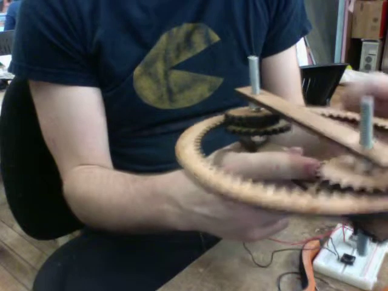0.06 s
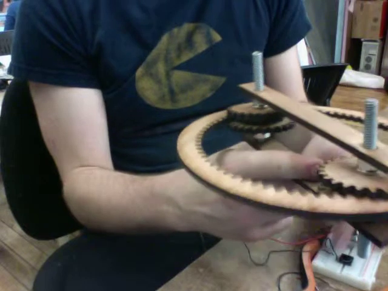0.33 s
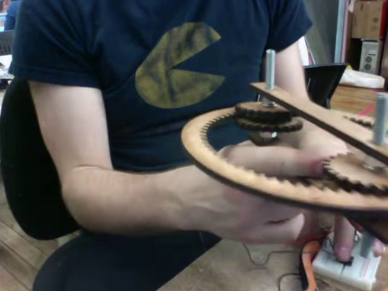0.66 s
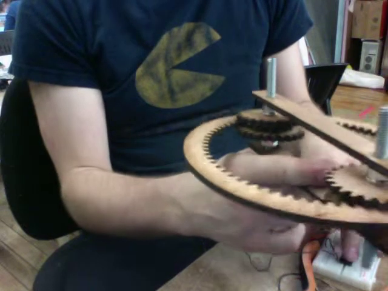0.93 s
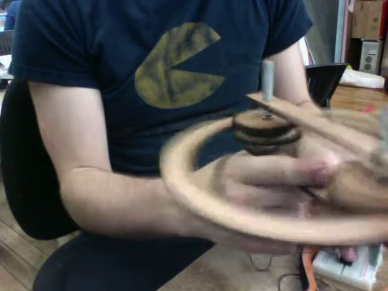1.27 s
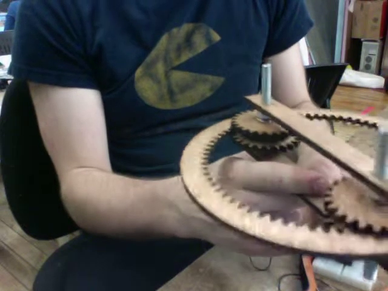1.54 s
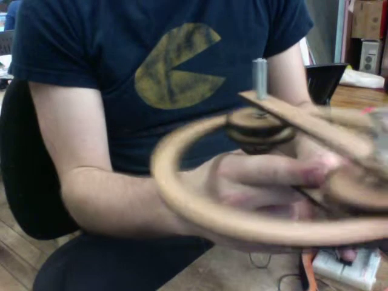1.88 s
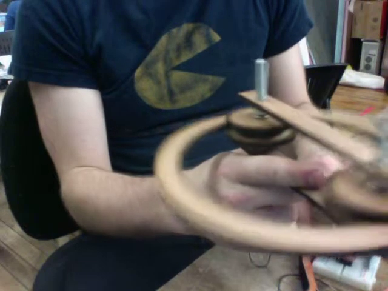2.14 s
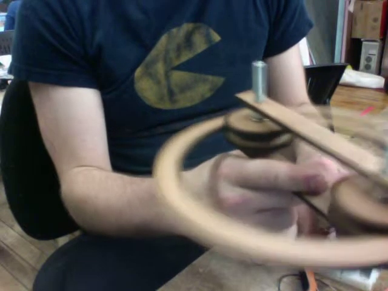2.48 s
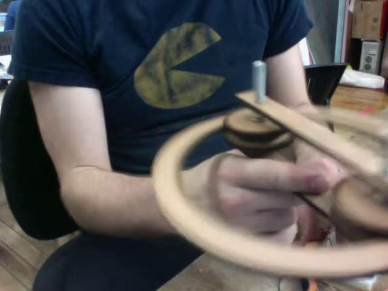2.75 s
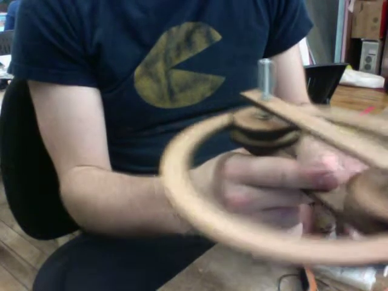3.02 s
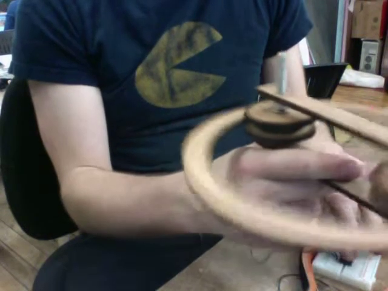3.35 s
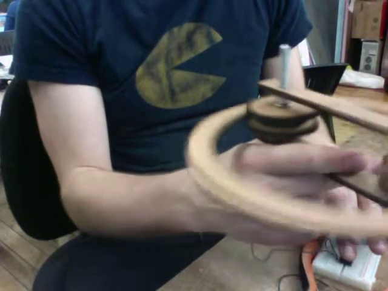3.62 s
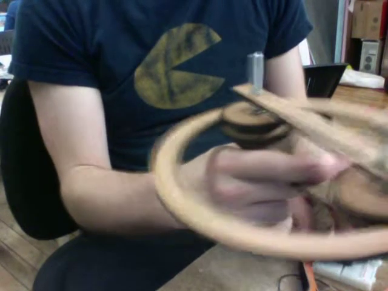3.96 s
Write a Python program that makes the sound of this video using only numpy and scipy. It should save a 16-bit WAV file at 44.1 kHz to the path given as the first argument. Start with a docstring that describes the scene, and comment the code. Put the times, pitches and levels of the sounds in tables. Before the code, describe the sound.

Thin wooden gears rattle and clack close by, nudged briefly, then spun steadily.

```python
"""A thin wooden ring gear is nudged, rests, then is spun by hand around its small wooden gears.
Each tooth that catches is a flurry of tiny impacts that ring the plywood; loose teeth rattle in between.
Teeth stick and slip in tiny squeaks, single teeth tick at rest, and the frame knocks and rumbles
in the hand. All is close by, in a quiet room that hums faintly."""
import sys
import numpy as np
from scipy import signal
from scipy.fft import rfft, irfft
from scipy.io import wavfile
from scipy.ndimage import uniform_filter1d

SR = 44100
rng = np.random.default_rng(int(sys.argv[2]) if len(sys.argv) > 2 else 0)


def persist_wave(psi):
    """Save psi, clipped to +-1, as 16-bit WAV."""
    counts = np.round(np.clip(psi, -1, 1) * 32767).astype(np.int16)
    wavfile.write(sys.argv[1], SR, np.atleast_2d(counts).T)


N = 176400

# plywood gear modes (frequency [Hz], width [Hz], gain [dB])
GEAR_MODES = [(1368, 90, -12.5), (1967, 315, -4), (2455, 203, 0), (2912, 266, 2), (4205, 240, -4),
              (4896, 450, -6), (5890, 340.3, -4.5), (6590, 430, -6), (7446, 360, -6.5), (8780, 690, -11.5),
              (10400, 496.6, -18.5), (12080, 604.5, -18), (13800, 573, -26), (14900, 700, -27)]
# whole-frame modes (frequency [Hz], width [Hz], gain [dB])
FRAME_MODES = [(115, 82, -10.5), (206, 89, -3), (280, 126, -2), (382, 110, 4), (487, 126, -3),
               (637, 118, 2), (756, 107, 2.5), (846, 150, -2), (1171, 105, -1)]
GEAR_HZ, FRAME_HZ = np.transpose(GEAR_MODES)[0], np.transpose(FRAME_MODES)[0]
TIME_S = np.arange(N) / SR


def amp(db):
    """Decibels to gain."""
    return 10 ** (np.asarray(db) / 20)


def unit(x):
    """Scale to rms 1."""
    return x / np.sqrt(np.mean(x ** 2) + 1e-20)


def at_hz(curve, hz):
    """Interpolate a table on a log-frequency axis."""
    knots_hz, value = np.transpose(curve)
    return np.interp(np.log(hz + 1), np.log(knots_hz + 1), value)


def add(mix, start_s, sound):
    """Mix a sound in at start_s."""
    part = mix[max(round(start_s * SR), 0):][:len(sound)]
    part += sound[:len(part)]


def noise(spectrum):
    """Steady shaped noise, rms 1."""
    gain = amp(at_hz(spectrum, np.fft.rfftfreq(N, 1 / SR)))
    return unit(irfft(rfft(rng.standard_normal(N)) * gain, N))


def coloured(x, curve):
    """Minimum-phase filter with a given gain curve."""
    log_gain = np.log(amp(at_hz(curve, abs(np.fft.fftfreq(4096, 1 / SR)))))
    response = np.exp(np.conj(signal.hilbert(log_gain)))
    return signal.oaconvolve(x, np.fft.ifft(response).real[:2048])[:N]


def impacts(size, per_s, spread_db):
    """Tiny impacts at random times, most weak, a few strong."""
    strength = amp(spread_db * np.minimum(rng.exponential(1, size), 3))
    return (rng.random(size) < per_s / SR) * strength * rng.choice([-1, 1], size)


def ring(force, modes, gains_db=0, detune=0, place_spread=0.88):
    """Impacts ring damped modes; each lands elsewhere and so shares its energy differently."""
    hz, width_hz, db = np.transpose(modes)[:, :, None]
    hz = hz * (1 + detune * rng.standard_normal(hz.shape))
    t = np.arange(int(2 * SR / width_hz.min())) / SR
    gain = np.sqrt(width_hz) * amp(db + np.reshape(gains_db, (-1, 1)))
    responses = gain * np.exp(-np.pi * width_hz * t) * np.sin(2 * np.pi * hz * t)
    polarity = rng.choice([-1, 1], hz.shape)
    coupling = polarity + place_spread * rng.standard_normal((len(hz), force.shape[-1]))
    return signal.oaconvolve(force * coupling, responses, axes=1).sum(0)


def background(air_db=-53, wash_db=-48, wash_fall_db_per_s=24):
    """Room air, a faint hum and a soft wash that dies away."""
    # steady room tones (frequency [Hz], level [dB])
    hum_tones = [(284.5, -56.5), (486, -69.5), (684, -68.5)]
    # room air (frequency [Hz], relative density [dB])
    air_spectrum = [(25, -49.5), (60, -16), (110, -11.5), (200, -1), (290, 0), (350, -12.5), (480, -3.5),
                    (680, -14.5), (860, -14), (1100, -21), (1700, -25.5), (4500, -33.5), (8200, -36),
                    (11000, -46.5), (16000, -68)]
    # wash (frequency [Hz], relative density [dB])
    wash_spectrum = [(60, -22), (170, 5.5), (300, -11), (460, 3.5), (580, -9), (720, -1), (1050, -13),
                     (1550, -10), (2200, -20.5), (4200, -18.5), (8000, -31), (12000, -40), (16000, -58)]
    hum = sum(amp(db) * np.sqrt(2) * np.sin(2 * np.pi * hz * TIME_S) for hz, db in hum_tones)
    air = amp(air_db) * noise(air_spectrum)
    wash = amp(wash_db - wash_fall_db_per_s * TIME_S) * noise(wash_spectrum)
    return air + hum + wash


def room_tail(teeth, frame, teeth_db=-14.5, frame_db=-13):
    """Small room: sparse reflections, each band dying at its own rate."""
    # room decay (frequency [Hz], T60 [s])
    decay = [(150, 0.41), (1000, 0.95), (4000, 0.49), (8000, 0.23), (15000, 0.6)]
    # room's return of the teeth (frequency [Hz], gain [dB])
    return_colour = [(200, -5), (1400, -6), (2300, -3), (2900, -5.5), (3500, 0.5), (4200, -2.5),
                     (9000, -5.5), (15000, -16)]
    send = amp(teeth_db) * coloured(teeth, return_colour) + amp(frame_db) * frame
    size = SR // 2
    reflections = rng.standard_normal(size) * (rng.random(size) < .1) * (np.arange(size) > 200)
    hz, t, bands = signal.stft(reflections, SR, nperseg=256)
    tail = signal.istft(bands * amp(-60 * t / at_hz(decay, hz)[:, None]), SR, nperseg=256)[1]
    return signal.oaconvolve(send, tail / np.linalg.norm(tail))[:N]


def frame_rumble():
    """The turning ring shakes the frame with dense small impacts."""
    # rumble envelope (time [s], level [dB])
    envelope = [(.85, -69), (.92, -47.5), (1.1, -40), (1.25, -46), (1.4, -56), (1.5, -49.5), (1.68, -37),
                (2.05, -38), (2.3, -39), (2.6, -38), (4, -38.5)]
    force = impacts(N, per_s=1200, spread_db=3.5)
    return amp(np.interp(TIME_S, *np.transpose(envelope))) * unit(ring(force, FRAME_MODES)[:N])


def frame_knocks(decay_s=.005, gain_db=2):
    """Dull blows ring the frame in the hand."""
    # blows (time [s], level [dB])
    blows = [(1.09, -35), (1.139, -43), (1.538, -30), (1.687, -30.5), (1.745, -32), (1.772, -31.5),
             (1.952, -31.5), (1.985, -30.5), (2.013, -35), (2.029, -31.5), (2.056, -30), (2.105, -33),
             (2.138, -32), (2.413, -34), (2.594, -30.5), (2.624, -28.5), (2.667, -33.5), (2.739, -30),
             (2.774, -28.5), (2.893, -34), (2.924, -37), (2.967, -28.5), (3.034, -36), (3.091, -32),
             (3.106, -30), (3.188, -34), (3.432, -32), (3.47, -29), (3.505, -26.5), (3.544, -28.5),
             (3.858, -34.5)]
    # drive of the frame modes (frequency [Hz], gain [dB])
    excitation = [(120, -13), (300, -9), (750, 7.5), (1200, -2)]
    press = np.exp(-np.arange(0, 5 * decay_s, 1 / SR) / decay_s)
    mix = np.zeros(N)
    for time_s, db in blows:
        sound = ring(press * rng.standard_normal(len(press)), FRAME_MODES, at_hz(excitation, FRAME_HZ))
        sound *= np.sqrt(decay_s * SR) / np.linalg.norm(sound)
        add(mix, time_s - decay_s / 2, amp(db + gain_db) * sound)
    return mix


def contact_db(ring_db, treble_db, ring_hz=2800, sigma_hz=380, treble_hz=7000):
    """Gain per gear mode: a contact weights the tooth's ring and the treble."""
    near_ring = np.exp(-((GEAR_HZ - ring_hz) / sigma_hz) ** 2 / 2)
    return ring_db * near_ring + treble_db * (GEAR_HZ > treble_hz)


def tooth_ticks(gain_db=-0.5):
    """Single teeth drop into place at rest: light, bright taps."""
    # taps (start [s], length [s], level [dB], tooth ring [dB], treble [dB])
    taps = [(0.576, 0.0029, -25, 6, -1.5), (1.2729, .001, -14, 1, -4)]
    # drive of the gear modes (frequency [Hz], gain [dB])
    excitation = [(1400, -31), (2400, -15), (3000, -7.5), (4200, 0), (5900, 5.5), (8000, 10), (12000, -4),
                  (15000, -2)]
    mix = np.zeros(N)
    for start_s, length_s, db, ring_db, treble_db in taps:
        size = int(length_s * SR)
        gains_db = contact_db(ring_db, treble_db) + at_hz(excitation, GEAR_HZ)
        sound = ring(rng.standard_normal(size), GEAR_MODES, gains_db)
        add(mix, start_s, amp(db + gain_db) * sound * np.sqrt(size) / np.linalg.norm(sound))
    return mix


def tooth_squeaks(jitter_rad=0.22, pitch_sag=0.083, grit_db=-12, gain_db=-0.5):
    """Stick and slip drive one mode for milliseconds: a falling tone with grit."""
    # squeaks (centre [s], length [s], pitch [Hz], level [dB])
    squeaks = [(0.574, .006, 2830, -36), (0.5804, .006, 2800, -37), (1.118, .008, 2900, -17),
               (1.1446, .007, 2915, -19), (1.558, .006, 10500, -31), (1.587, .005, 10530, -24),
               (1.716, .007, 2940, -21), (1.7476, .006, 4230, -19), (1.7793, .007, 4210, -14),
               (1.803, .007, 3000, -28), (1.8766, .008, 2896, -17), (1.969, .007, 3040, -18),
               (2.0462, .008, 2930, -17.5), (2.279, .005, 7490, -22), (2.2844, .012, 2920, -23),
               (2.4658, .009, 2920, -19), (2.5961, .006, 2990, -15.5), (2.6141, .007, 2940, -20),
               (2.7626, .007, 2900, -13), (2.7877, .006, 10300, -27), (2.925, .007, 2940, -17.5),
               (3.134, .007, 2943, -23), (3.2145, .007, 3010, -19), (3.369, .006, 4290, -22),
               (3.533, .007, 4185, -14), (3.576, .006, 3030, -17), (3.6419, .005, 2900, -16),
               (3.6623, .007, 2920, -15), (3.672, .006, 10250, -25), (3.7995, .012, 2960, -20),
               (3.9003, .007, 2990, -19.5), (3.9234, .007, 2960, -21.5), (3.957, .007, 2886, -10.5)]
    mix = np.zeros(N)
    for centre_s, length_s, hz, db in squeaks:
        size = int(length_s * SR)
        progress = np.linspace(0, 1, size)
        jitter = jitter_rad * unit(uniform_filter1d(rng.standard_normal(size), size=30))
        glide_hz = hz * (1 + pitch_sag * (.5 - progress))
        tone = np.sqrt(2) * np.sin(2 * np.pi * np.cumsum(glide_hz) / SR + jitter)
        grit = unit(ring(rng.standard_normal(size) * (1 - progress) ** 2, GEAR_MODES)[:size])
        envelope = amp(db + gain_db) * np.sin(np.pi * progress ** 0.89)
        add(mix, centre_s - length_s / 2, envelope * (tone + amp(grit_db) * grit))
    return mix


def free_play():
    """Gain that dips briefly where the teeth lose touch."""
    # lulls (centre [s], 1/e half width [s], gain [dB])
    lulls = [(1.064, .005, -4), (1.215, 0.00443, -1), (1.602, 0.007, -7), (1.756, 0.00509, -0.5),
             (1.793, .006, -5), (1.897, .008, -5), (2.095, .004, -4.5), (2.115, 0.0067, -4),
             (2.203, 0.0061, -7.5), (2.293, 0.00449, -13), (2.365, 0.0056, -14), (2.388, 0.0062, -7),
             (2.606, 0.00684, -9), (2.683, .005, -6.5), (2.753, 0.0034, -3.5), (2.821, .004, -1.5),
             (2.836, 0.0049, -1.5), (2.902, 0.00503, -6), (3.05, 0.011, -1), (3.125, 0.0041, -15),
             (3.49, 0.00592, -5.5), (3.528, 0.0037, -1.5), (3.566, 0.00428, -1.5), (3.647, 0.00894, -15),
             (3.893, 0.0062, -8)]
    return amp(sum(db * np.exp(-((TIME_S - centre_s) / half_s) ** 2) for centre_s, half_s, db in lulls))


def tooth_rattle(drift_db=4, drift_per_s=140, gain_db=3):
    """Loose teeth rattle; the contact point wanders, so one mode after another stands out."""
    # rattle envelope (time [s], level [dB])
    envelope = [(.87, -71.5), (.895, -35.5), (.97, -45), (1.03, -33.5), (1.09, -29), (1.19, -33.5),
                (1.25, -44), (1.28, -73), (1.48, -63), (1.51, -46), (1.61, -28.5), (1.68, -25.5),
                (2.05, -26), (2.3, -26), (2.5, -26), (3.4, -26), (3.65, -26), (4, -28)]
    knots_s = np.arange(0, N / SR, 1 / drift_per_s)
    knot_gains = amp(drift_db * rng.standard_normal((len(knots_s), len(GEAR_MODES))))
    drift = np.array([np.interp(TIME_S, knots_s, gains) for gains in knot_gains.T])
    force = drift * impacts(N, per_s=1800, spread_db=3.5)
    shake = amp(gain_db + np.interp(TIME_S, *np.transpose(envelope)))
    return shake * unit(ring(force, GEAR_MODES)[:N])


def tooth_clacks(scrape_gain=0.53, first_blow=1.5, release_s=.002, mode_spread_db=2.5, gain_db=-1):
    """Each catching tooth scrapes in, strikes, chatters against its neighbour and lets go."""
    # catches (start [s], length [s], rise [s], level [dB], tooth ring [dB], treble [dB])
    catches = [(0.8985, 0.0096, 0.0011, -22, 5, 3), (0.911, 0.0067, 0.0038, -22, 5, 3.5),
               (0.9402, 0.0028, 0.0011, -47.5, -1.0, -3.5), (0.9488, 0.0053, 0.0011, -23.5, -4.0, -3.5),
               (0.9961, 0.021, 0.0034, -36, 9.5, 5), (1.0297, 0.012, 0.004, -48, -4, -6),
               (1.0503, 0.01219, 0.0035, -22.5, -8, 1.0), (1.0733, 0.0054, 0.0013, -18.5, -15, -4),
               (1.0888, 0.018, 0.003, -18.5, 0.0, 4), (1.122, 0.006, 0.004, -22, -9, -6),
               (1.133, 0.018727, 0.0035, -20, -4, -1.0), (1.1609, 0.00799, 0.0034, -23.5, -6.5, 0),
               (1.1772, 0.007434, 0.0011, -21.0, -15, 4), (1.1832, 0.016, 0.004, -21.5, -1, 2.5),
               (1.2123, 0.005487, 0.0013, -22, -3, -1), (1.231, 0.00654, 0.004, -28.5, 2, -3.0),
               (1.5048, 0.01, 0.0009, -33.5, -1.0, 5), (1.5363, 0.004, 0.001, -17.5, -8, -6.5),
               (1.5474, 0.017, 0.004, -27, 0.5, -1), (1.5681, 0.00569, 0.0013, -41, -2.0, -7.5),
               (1.5858, 0.0063, 0.001, -16, -8.5, 0.5), (1.597, 0.003, 0.0038, -15, 6, 8.5),
               (1.6518, 0.012822, 0.004, -17, 3.5, 3), (1.691, 0.009023, 0.0034, -13.5, -15, 0),
               (1.705, 0.015, 0.004, -21, 5.5, 4.0), (1.715, 0.023, 0.004, -23.5, 8, -3.0),
               (1.7448, 0.00522, 0.0033, -18.5, -5.0, -4.0), (1.7754, 0.00635, 0.0011, -13.5, -4, -6.0),
               (1.8155, 0.04, 0.0037, -23.5, -4, 0.0), (1.8612, 0.032, 0.0033, -19.5, 1, 1),
               (1.907, 0.0078, 0.0011, -16, 0, 6), (1.951, 0.007361, 0.004, -15.5, 1.0, 3),
               (1.9787, 0.02, 0.004, -15.5, -4, 3.5), (1.9996, 0.015, 0.004, -20.5, 4, 4.5),
               (2.019, 0.021444, 0.004, -18.5, 0, 9.5), (2.0384, 0.012, 0.004, -21.5, 0, 4),
               (2.0504, 0.047, 0.004, -17, -1, -1.0), (2.1034, 0.0069, 0.0012, -12.5, -4.5, 4),
               (2.1357, 0.0097, 0.0031, -14, -3, 3.5), (2.158, 0.012, 0.004, -19.5, 1.0, 0),
               (2.1819, 0.007338, 0.004, -13, 0, 5), (2.2117, 0.017, 0.004, -19.5, 7, 8),
               (2.2414, 0.009, 0.004, -20.5, -7, -2), (2.2564, 0.011, 0.004, -15, 5, 9),
               (2.341, 0.02, 0.004, -19.5, -2.5, 8), (2.371, 0.0089, 0.0035, -25, 4.0, -4.5),
               (2.396, 0.028, 0.0031, -19.5, -4, 2.5), (2.431, 0.026, 0.0034, -18, 1.0, 2),
               (2.4753, 0.02, 0.0012, -19.0, -4, 1), (2.51, 0.007407, 0.004, -15, -4.5, 0),
               (2.527, 0.010143, 0.0027, -21.0, -5, 8), (2.5493, 0.0078, 0.0012, -13, -0.5, 4.5),
               (2.5663, 0.017, 0.004, -17.5, -7, -3), (2.592, 0.006785, 0.0012, -13, 2, 5),
               (2.614, 0.01963, 0.003, -19.0, -1, 2), (2.6474, 0.028, 0.004, -19, -0.5, 4),
               (2.685, 0.01, 0.0011, -17.5, 8, 1), (2.697, 0.013, 0.004, -18, -1, 7),
               (2.7206, 0.018, 0.0032, -21, -6, -6), (2.7436, 0.0046, 0.004, -13, -9.5, 10),
               (2.7715, 0.011, 0.0033, -16, -4, 1.0), (2.7828, 0.019, 0.004, -19.0, -6, 3),
               (2.815, 0.007, 0.0013, -10.5, -6, 5.5), (2.837, 0.022, 0.0028, -19.0, 2.0, -4),
               (2.8642, 0.014, 0.0034, -16.5, -7, -2), (2.88, 0.019, 0.004, -17, 2.5, 6),
               (2.9211, 0.012, 0.004, -14.5, -7, 3), (2.939, 0.04, 0.004, -19.5, -2.5, 6),
               (2.9965, 0.012, 0.0028, -15.5, -2, 1.5), (3.0176, 0.027, 0.004, -19, -1.5, 3),
               (3.0653, 0.006, 0.001, -15.5, -3, 0), (3.069, 0.0094, 0.004, -12.5, 4, 5.5),
               (3.089, 0.03, 0.0037, -18.5, -3, 5.5), (3.124, 0.0089, 0.004, -20, 10, -7.5),
               (3.141, 0.02, 0.004, -20.5, -2.5, -2), (3.171, 0.019, 0.004, -16, -13.5, 2.5),
               (3.2141, 0.021, 0.0031, -15.5, 0.5, 6), (3.23, 0.01298, 0.004, -17.0, -10, -9),
               (3.2523, 0.012777, 0.0035, -18.5, 11, 12.5), (3.276, 0.006746, 0.004, -21.0, 17, -9),
               (3.288, 0.012, 0.0028, -16.5, -2, 3), (3.3055, 0.010443, 0.004, -19.5, 0, -7.5),
               (3.3253, 0.021, 0.0038, -18, 0, 0), (3.366, 0.011, 0.0034, -18, -10, -4.5),
               (3.381, 0.01914, 0.004, -20.0, -7, -15), (3.4052, 0.013, 0.001, -14, 2, 3),
               (3.4307, 0.01841, 0.004, -21, 6, -2.0), (3.4553, 0.029, 0.0037, -20.5, -4.5, 2.0),
               (3.502, 0.012533, 0.0037, -15, -4.5, 5), (3.527, 0.014, 0.001, -15.0, -6, -3.0),
               (3.5456, 0.009, 0.004, -11, -2.5, 3), (3.5714, 0.0077, 0.0027, -18.5, 11, 6),
               (3.583, 0.014, 0.004, -19, 1, -2), (3.6096, 0.011, 0.004, -17, 7, -16),
               (3.6675, 0.008, 0.0036, -17.5, -11, -3.0), (3.695, 0.021, 0.004, -19.5, 2, 2.0),
               (3.729, 0.029, 0.0035, -23, 1.0, -3.0), (3.7534, 0.016, 0.004, -17, -5, -13),
               (3.779, 0.008855, 0.0031, -15.5, 0.5, 9), (3.8144, 0.007606, 0.0033, -20, 11, -6),
               (3.83, 0.0097, 0.0012, -14, -1.5, -21), (3.8605, 0.01043, 0.0027, -17.5, -2, -4),
               (3.9006, 0.018, 0.001, -21.0, 4, 0.0), (3.9183, 0.01438, 0.004, -24.5, -0.5, -17),
               (3.9431, 0.014, 0.0013, -18.5, -0.5, 7.5), (3.985, 0.01439, 0.0031, -19.5, 5, -19)]
    # hollow lowest gear mode (time [s], gain [dB])
    hollow = [(.9, 0), (1.2, 6), (1.5, -2.5), (2.5, 3), (3.2, -2.5), (4, -6)]
    mix = np.zeros(N)
    for start_s, length_s, rise_s, db, ring_db, treble_db in catches:
        gains_db = contact_db(ring_db, treble_db) + mode_spread_db * rng.standard_normal(len(GEAR_MODES))
        gains_db[0] += np.interp(start_s, *np.transpose(hollow))
        lead_s = 3 * rise_s
        t = np.arange(-lead_s, length_s + 4 * release_s, 1 / SR)
        press = np.exp(np.minimum(t, 0) / rise_s - np.maximum(t - length_s, 0) / release_s)
        press[t < 0] *= scrape_gain
        force = press * impacts(len(t), per_s=2600, spread_db=4)
        force[np.argmax(press)] += first_blow
        sound = ring(force, GEAR_MODES, gains_db, detune=.018)
        sound *= np.linalg.norm(press) / (np.linalg.norm(sound) + 1e-9)
        add(mix, start_s - lead_s, amp(db + gain_db) * sound)
    return mix


def scene(low_cut_hz=154):
    """Teeth and frame, both shaken by the turning ring, in the room."""
    # close-microphone colour of the teeth (frequency [Hz], gain [dB])
    close_colour = [(300, -25.5), (800, -11.5), (1050, -12), (1350, 0), (1650, -8), (2100, -4),
                    (2900, -1.5), (3550, 2), (4200, 1.5), (6000, 1), (6900, -5.5), (8500, 0.5), (12000, -1),
                    (16000, -9.5)]
    ambience = background()
    rattle = tooth_rattle()
    rumble = frame_rumble()
    meshing = (rattle + tooth_clacks()) * free_play()
    teeth = coloured(meshing + tooth_squeaks() + tooth_ticks(), close_colour)
    frame = rumble + frame_knocks()
    low_cut = signal.butter(3, low_cut_hz, "high", fs=SR, output="sos")
    gears = signal.sosfilt(low_cut, teeth + frame + room_tail(teeth, frame))
    return (gears + ambience)[None]


def record(dry, edge_hz=16100):
    """Steep low-pass band limit."""
    low_pass = signal.firwin(511, edge_hz, window=("kaiser", 9), fs=SR)
    return signal.oaconvolve(dry, low_pass[None], "same")


dry = scene()
out = record(dry)
persist_wave(out)
```